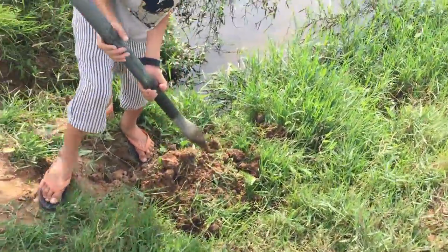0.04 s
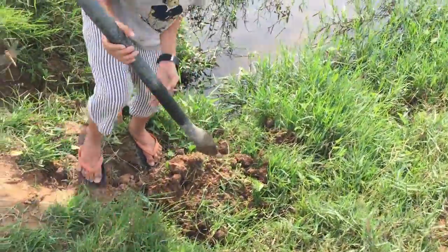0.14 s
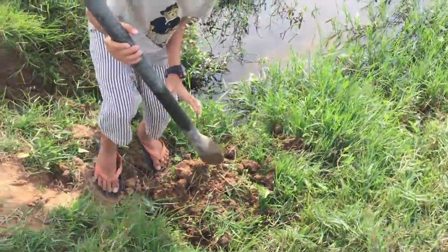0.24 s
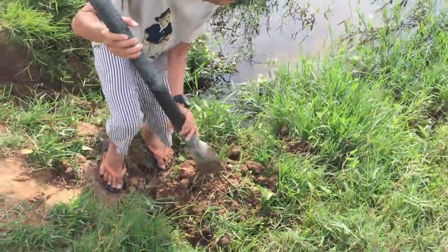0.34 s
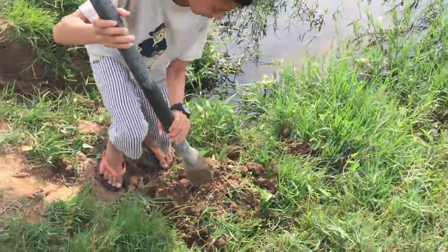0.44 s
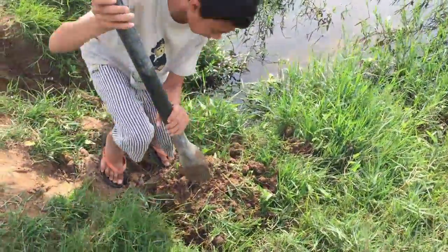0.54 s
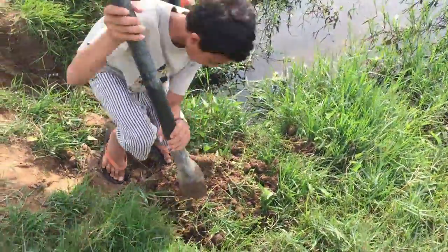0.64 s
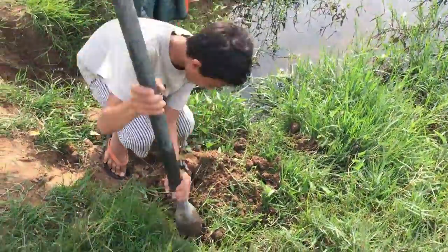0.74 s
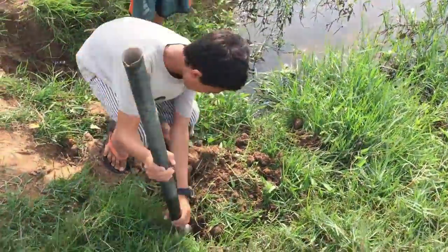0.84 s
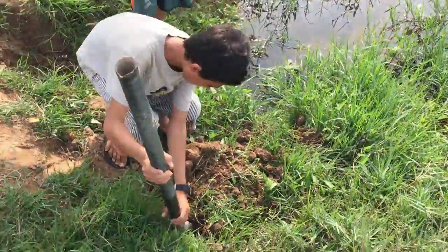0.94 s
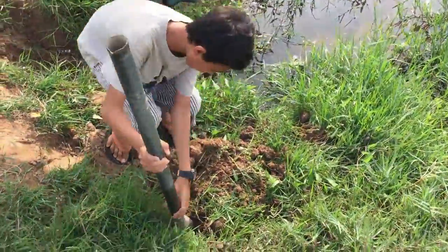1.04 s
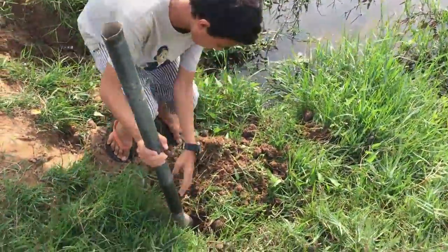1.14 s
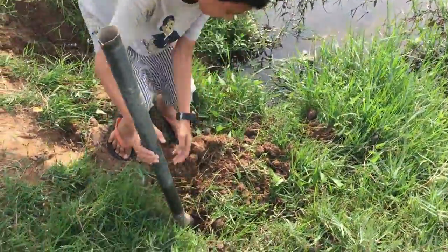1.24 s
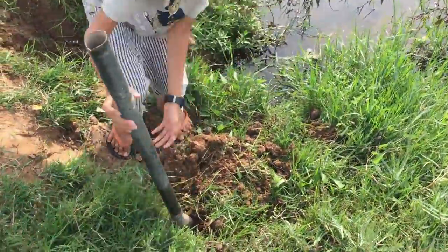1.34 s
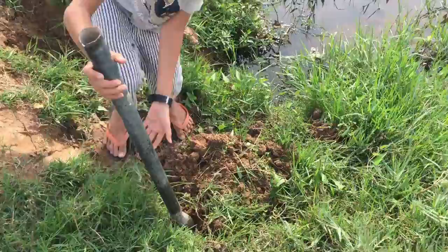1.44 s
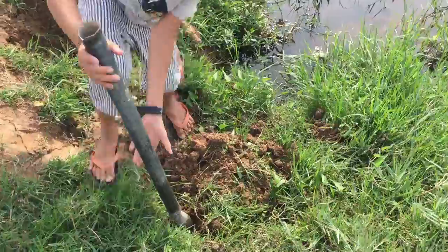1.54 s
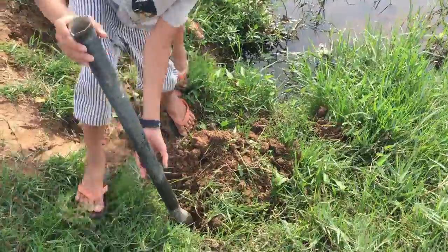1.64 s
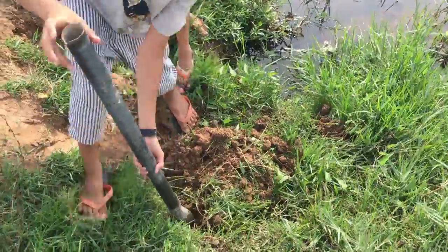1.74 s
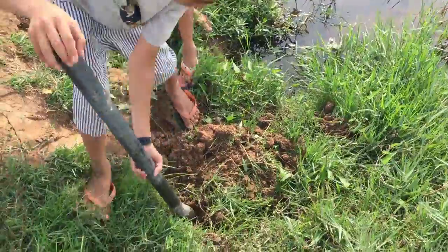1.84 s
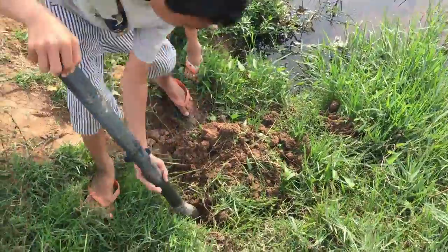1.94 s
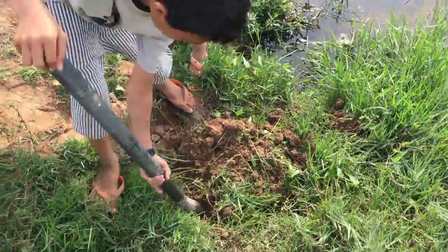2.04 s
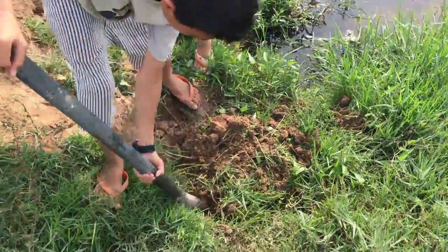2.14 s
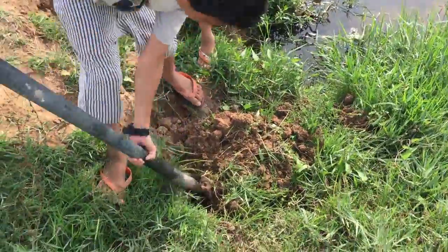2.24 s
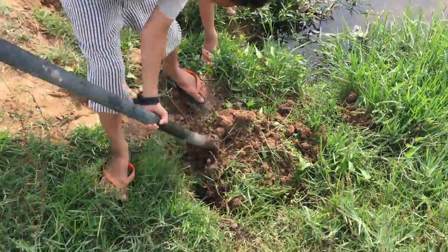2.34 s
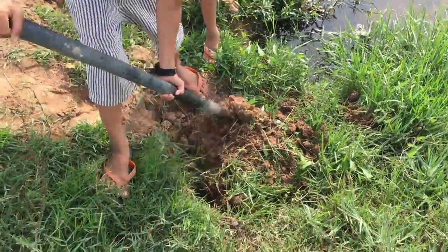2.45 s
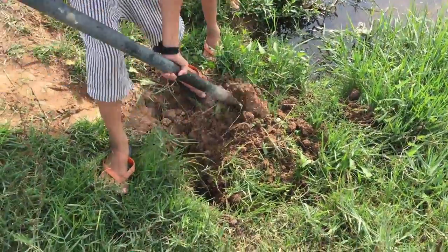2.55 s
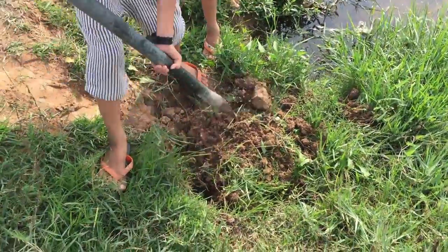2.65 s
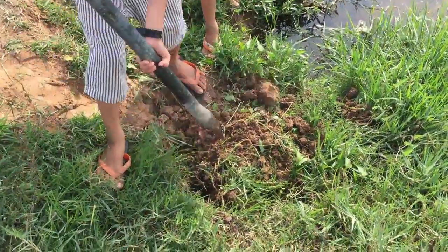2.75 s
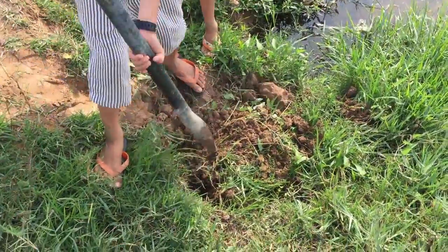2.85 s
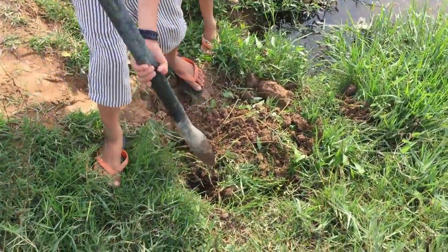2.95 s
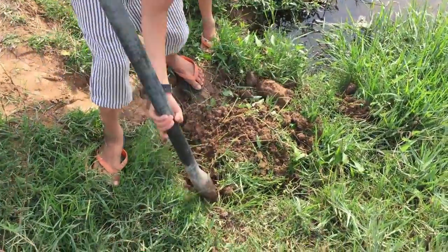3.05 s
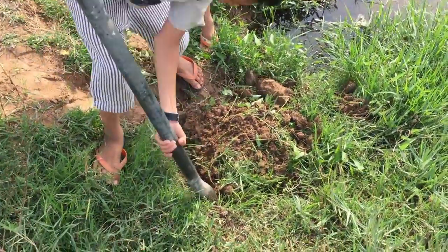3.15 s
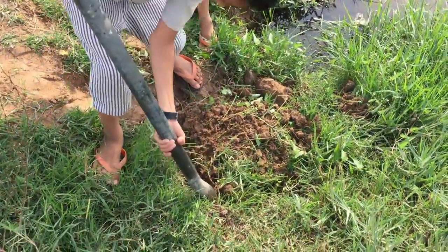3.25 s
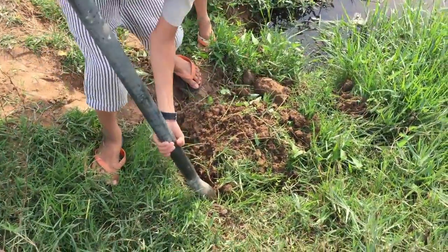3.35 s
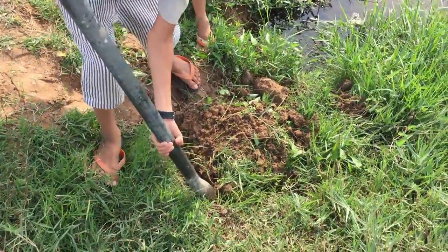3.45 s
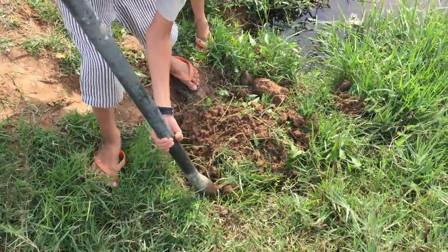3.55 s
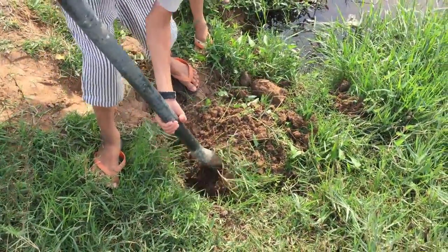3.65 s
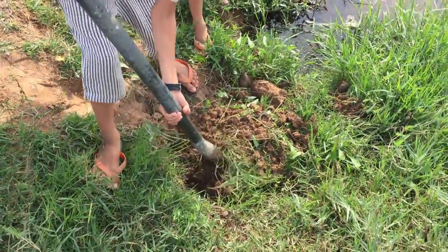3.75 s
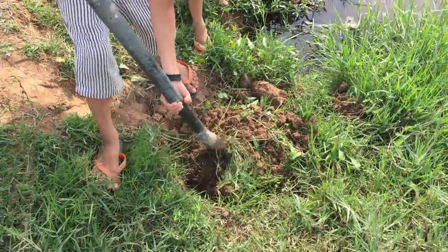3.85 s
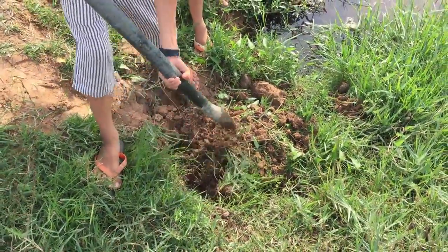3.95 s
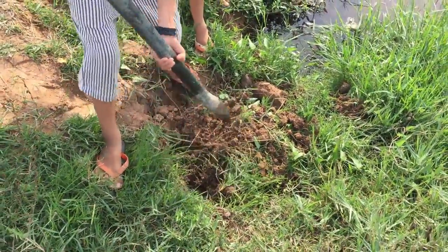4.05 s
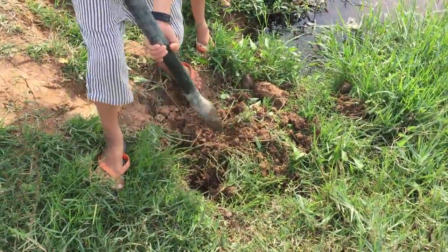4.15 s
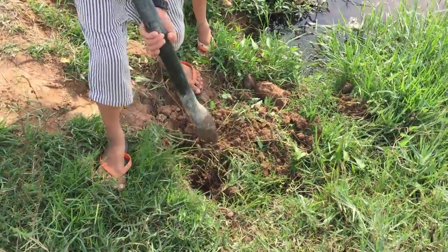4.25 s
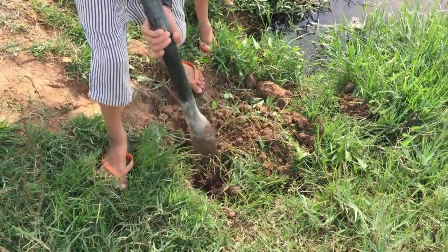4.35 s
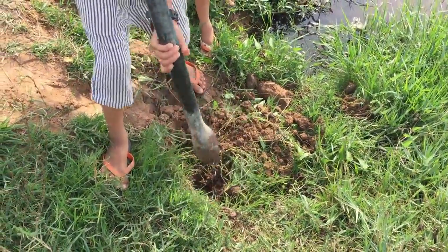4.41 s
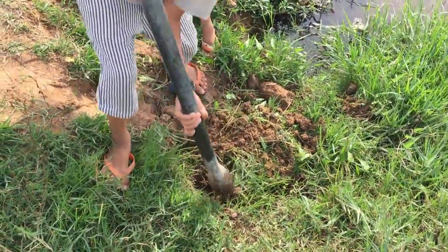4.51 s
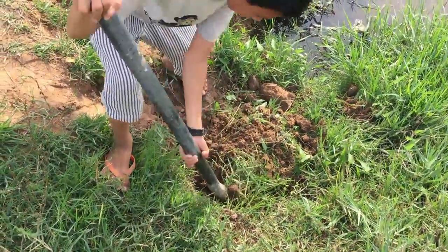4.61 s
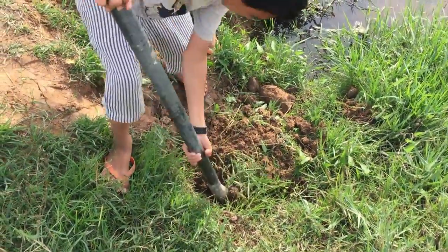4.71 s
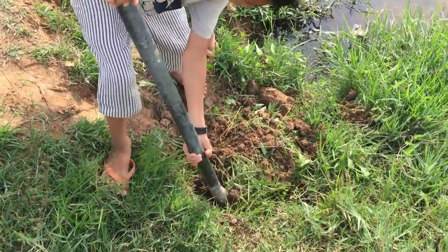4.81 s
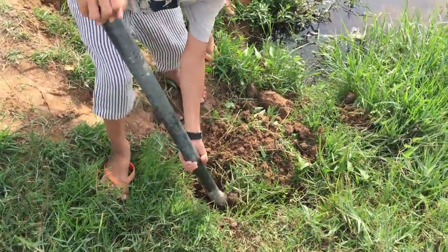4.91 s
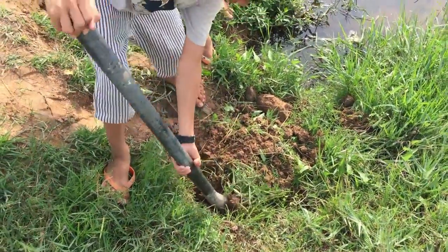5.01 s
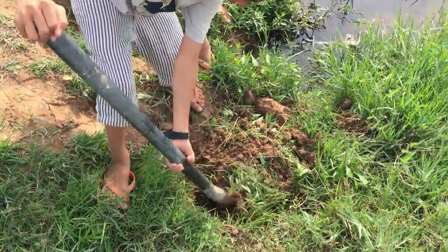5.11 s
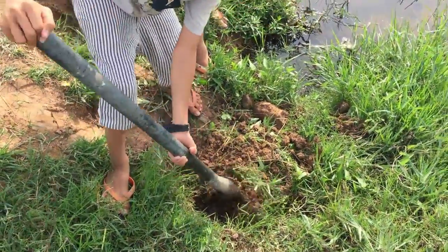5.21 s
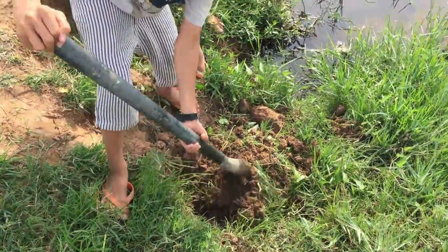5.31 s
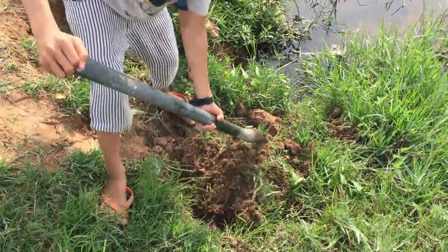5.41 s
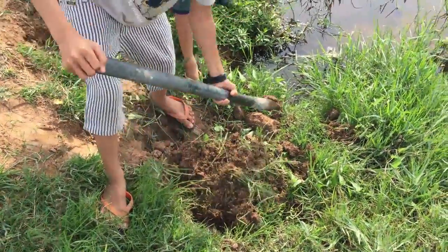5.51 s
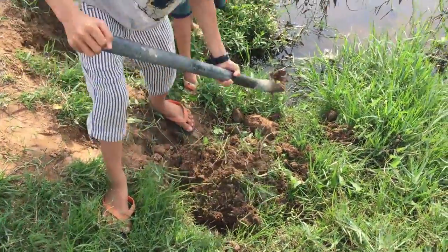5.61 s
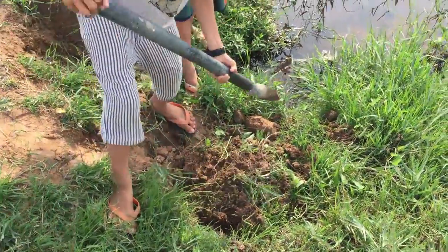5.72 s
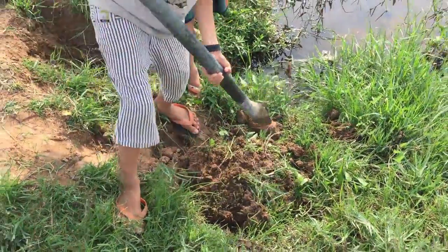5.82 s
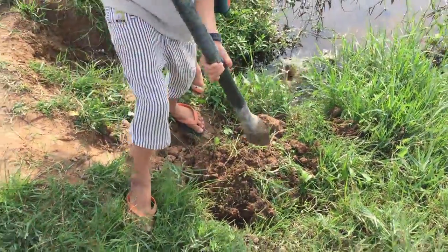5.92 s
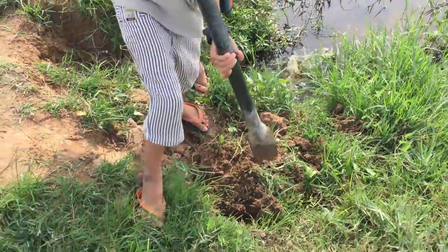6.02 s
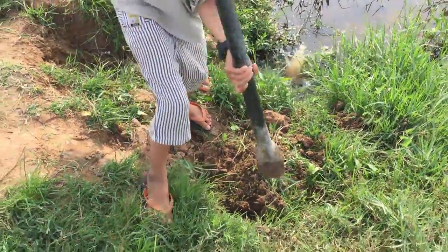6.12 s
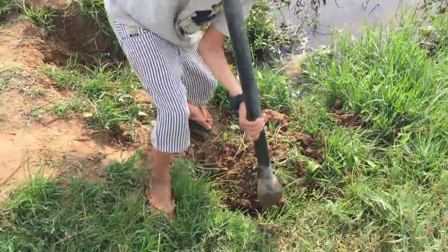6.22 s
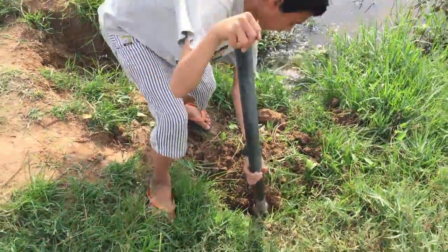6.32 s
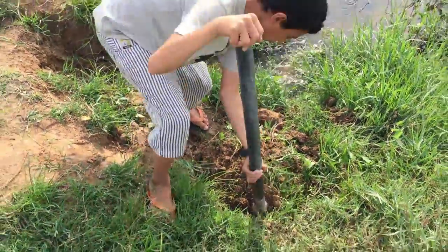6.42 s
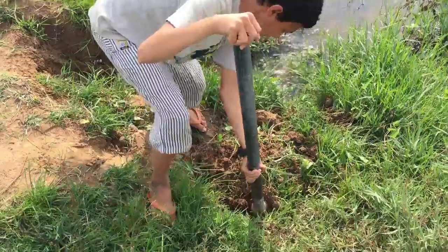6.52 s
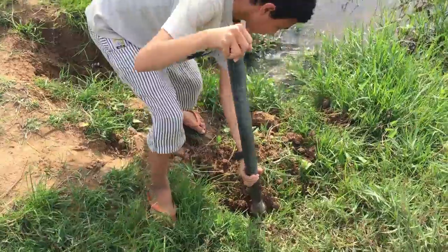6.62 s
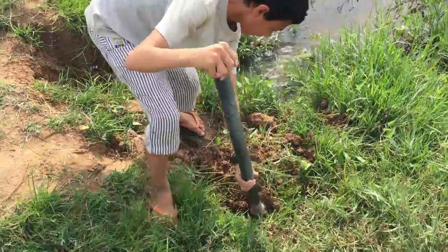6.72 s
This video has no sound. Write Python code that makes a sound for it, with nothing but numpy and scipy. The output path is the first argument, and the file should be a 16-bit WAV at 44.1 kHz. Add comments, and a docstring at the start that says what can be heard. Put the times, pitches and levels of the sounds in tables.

```python
"""Digging on a pond bank: low rumble, hum, a faint whine and soft air hiss (shaped noise and tones) run throughout.
From the start grit scrapes on steel and roots snap (showers of clicks), and a small bird sings (gliding tones).
Four chops into wet soil follow, near 0.9, 3.2, 4.7 and 6.4 s: crunching grains, ringing steel and a dull thud.
Before the last chop, crumbs and a flung clod splash into the water (click bursts), with ringing bubbles."""
import sys
import numpy as np
from scipy import signal
from scipy.fft import rfft, irfft, next_fast_len
from scipy.io import wavfile
from scipy.ndimage import uniform_filter1d, map_coordinates

SR = 44100
rng = np.random.default_rng(int(sys.argv[2]) if len(sys.argv) > 2 else 0)


def transcribe(u):
    """Save the signal u as a 16-bit wav file named by the first command-line argument.

    u: samples, shape (n,) or (channels, n), limited to [-1, 1]; the rate is SR.
    q: integer samples, one column per channel.
    """
    v = np.clip(np.atleast_2d(u).T, -1, 1)
    q = np.round(v * 32767).astype(np.int16)
    wavfile.write(sys.argv[1], SR, q)


N = 298557
TIME = np.arange(N) / SR


def amp(db):
    """Turns decibels into a plain gain."""
    return 10 ** (np.asarray(db) / 20)


def unit(x):
    """Scales a sound to an average strength (rms) of 1."""
    return x / np.sqrt(np.mean(x ** 2) + 1e-20)


def even_out(x, size):
    """Levels a sound moment by moment, so that a later curve alone sets its strength."""
    return x / np.sqrt(uniform_filter1d(x ** 2, size=size) + 1e-9)


def read(points, hz):
    """Reads a spectrum in dB, joining its points along a log-frequency axis."""
    point_hz, db = np.transpose(points)
    return np.interp(np.log(hz + 1), np.log(point_hz + 1), db)


def colour(x, gain_at):
    """Filters a sound by a gain for each frequency, then scales it to rms 1."""
    size = next_fast_len(len(x))
    spectrum = rfft(x, size) * gain_at(np.fft.rfftfreq(size, 1 / SR))
    return unit(irfft(spectrum, size)[:len(x)])


def hump(hz, octaves):
    """Makes a gain curve with one smooth hump around a centre pitch."""
    return lambda f: np.exp(-.5 * (np.log2((f + 1) / hz) / octaves) ** 2)


def resonances(modes, f):
    """Gain of an object that favours a few pitches and passes the rest evenly."""
    peaks = sum((amp(db) ** 2 - 1) / (1 + (2 * (f - hz) / width) ** 4) for hz, width, db in modes)
    return np.sqrt(np.maximum(1 + peaks, .1))


def drift(size, hz):
    """Random wandering of rms 1, mostly slower than hz."""
    return colour(rng.standard_normal(size), lambda f: np.exp(-(f / hz) ** 2))


def grains(size, per_s, spread_db, haze):
    """Tiny fractures of uneven size over a haze of finer ones."""
    happens = rng.random(size) < per_s / SR
    strength = amp(spread_db * np.minimum(rng.exponential(1, size), 4))
    clicks = rng.choice([-1, 1], size) * happens * strength
    return unit(unit(clicks) + haze * rng.standard_normal(size))


def add(mix, s, sound):
    """Mixes a sound in at time s."""
    part = mix[max(round(s * SR), 0):][:len(sound)]
    part += sound[:len(part)]


def tone(hz, waver_hz):
    """A steady tone of rms 1 whose pitch wavers a little."""
    pitch = hz + waver_hz * drift(N, 8.6)
    return unit(np.sin(2 * np.pi * np.cumsum(pitch) / SR))


# spectrum of the air hiss: (frequency [Hz], level per Hz [dB])
AIR_SPECTRUM = [(100, -12.5), (200, -1), (340, -8), (500, -11.5), (720, -11), (1100, -9), (1600, -10),
                (2900, -13), (4800, -17), (7500, -20), (8900, -16), (10300, -24), (12500, -18.5),
                (16000, -20.5)]


def open_air(patchy_db=3.0, count=12):
    """Soft hiss whose pitch bands swell and sink separately."""
    hz, _, z = signal.stft(rng.standard_normal(N), SR, nperseg=1024)
    frames = np.arange(z.shape[1])
    centres = np.geomspace(200, 16000, count)
    swells = np.array([drift(len(frames), SR / 20) for _ in centres])  # mostly slower than once in 20 frames
    band = np.interp(np.log(hz + 1), np.log(centres), np.arange(count))
    patches = map_coordinates(swells, np.meshgrid(band, frames, indexing="ij"), order=1)
    calm = 1 / (1 + hz[:, None] / 5000)  # the high hiss is steadier
    gain = amp(read(AIR_SPECTRUM, hz)[:, None] + patchy_db * calm * patches)
    return unit(signal.istft(z * gain, SR, nperseg=1024)[1][:N])


# spectrum of the low rumble: (frequency [Hz], level per Hz [dB])
RUMBLE_SPECTRUM = [(22, -55), (31, -32), (41, -7.5), (60, 0), (85, -4), (108, -5), (130, -10.5),
                   (165, -18.5), (210, -37.5), (300, -33), (500, -83)]
# slow level of rumble and hum together, before their flutter and own trims: (time [s], level [dB])
RUMBLE_LEVEL = [(0, -49.5), (1.2, -49.5), (1.7, -52.5), (3.4, -49.5), (4.7, -51.5), (5.7, -50.5),
                (6.15, -46), (6.77, -49.5)]
# slow level of the hiss: (time [s], level [dB])
AIR_LEVEL = [(0, -64), (.8, -64), (1.2, -64), (2.9, -64), (3.45, -66.5), (5, -67), (5.8, -64)]
# slow level of the far-off whine, before its flutter: (time [s], level [dB])
WHINE_LEVEL = [(2.6, -85), (3.1, -79), (5.8, -85)]


def background(rumble_db=-1, hum_hz=79, hum_db=-6, whine_hz=856):
    """Low noise and a hum flutter together, beside a faint far-off whine and the hiss of open air."""
    rumble = colour(rng.standard_normal(N), lambda f: amp(read(RUMBLE_SPECTRUM, f)))
    low = amp(rumble_db) * rumble + amp(hum_db) * tone(hum_hz, waver_hz=2.47)
    fluttering_low = low * amp(1.66 * drift(N, 16))
    whine = tone(whine_hz, waver_hz=7.07) * amp(1.8 * drift(N, 8.9))
    layers = [(fluttering_low, RUMBLE_LEVEL), (open_air(), AIR_LEVEL), (whine, WHINE_LEVEL)]
    return sum(sound * amp(np.interp(TIME, *np.transpose(level))) for sound, level in layers)


# levering and dragging, one row a stroke, levels before the judder:
# (start [s], length [s], grit level [dB], crumbling earth level [dB])
STROKES = [(0.043, 0.14, -58.5, -68.5), (0.301, 0.098, -70, -68), (.62, 0.077, -68.5, -67.5),
           (0.844, .015, -62.5, -63), (1.395, 0.13, -59.5, -62.5), (1.746, 0.013, -45.5, -50.5),
           (1.806, 0.064, -53.5, -59), (2.02, .06, -61, -68.5), (2.267, 0.034, -51.5, -56.5),
           (2.335, 0.054, -60, -64), (2.482, .032, -51.5, -60.5), (2.718, .13, -62.5, -71),
           (3.653, 0.076, -54, -54.5), (3.763, 0.046, -50.5, -59), (3.954, .052, -55.5, -67),
           (5.171, 0.21, -53.5, -59.5), (5.434, 0.048, -48, -54.5), (5.986, 0.052, -48, -57),
           (6.118, 0.11, -60.5, -65.5), (6.45, 0.092, -57, -62), (6.599, .16, -65, -69)]
# spectrum of the grit: (frequency [Hz], level per Hz [dB])
GRIT_SPECTRUM = [(1500, -14), (2600, -4), (3900, -2), (4900, -6), (6500, -2), (7700, -6), (9500, -2.5),
                 (10600, -7), (13400, -1.5), (16000, -8)]
# spectrum of the crumbling earth: (frequency [Hz], level per Hz [dB])
EARTH_SPECTRUM = [(150, 1), (300, -5), (550, -6.5), (820, -11.5), (1150, -3), (1600, -0.5), (2600, -2.5),
                  (3600, -11), (5500, -30)]
# resonances of the blade while earth presses on it, before detuning: (frequency [Hz], width [Hz], gain [dB])
PRESSED_BLADE = [(1124, 50, 5), (1577, 53, 8.5), (1983, 50, 8), (2720, 82, 6.5), (3520, 110, 4),
                 (4150, 55, 3.5), (4330, 93, 5), (5500, 160, 6), (6610, 150, 3), (9600, 150, 1)]


def scrapes(judder_db=1.7, judder_hz=70):
    """Grit rubs along the steel while the earth crumbles; both judder with the stick and slip of the blade."""
    out = np.zeros(N)
    for s, length, grit_db, earth_db in STROKES:
        # the blade gathers speed, slides and stops; longer strokes start and stop more gently
        swell, stop = .011 + .22 * length, .014 + .18 * length
        t = np.arange(max(s - 4 * swell, 0), s + length + 4 * stop, 1 / SR) - s
        off_slide = np.maximum(-t, 0) / swell + np.maximum(t - length, 0) / stop
        speed = np.exp(-off_slide ** 1.07)
        grip = 1 + 0.031 * rng.standard_normal()  # the soil's grip detunes the blade from stroke to stroke
        fine = grains(len(t), 2600, 3, .9)
        coarse = grains(len(t), 700, 3.1, .6)
        grit = colour(fine, lambda f: amp(read(GRIT_SPECTRUM, f)) * resonances(PRESSED_BLADE, f * grip))
        earth = colour(coarse, lambda f: amp(read(EARTH_SPECTRUM, f)) * resonances(PRESSED_BLADE, f * grip))
        rubbing = amp(grit_db) * grit + amp(earth_db) * earth
        judder = amp(judder_db * drift(len(t), judder_hz))
        add(out, s + t[0], speed * rubbing * judder)
    return out


def clods(x, colour_db=3.0, change_s=.035, patch_hz=260):
    """The contact keeps moving to other lumps of soil, each of which favours its own pitches."""
    z = signal.stft(x, SR, nperseg=512)[2]
    bins, frames = max(round(patch_hz * 512 / SR), 1), max(round(change_s * SR / 256), 1)
    across_pitch = uniform_filter1d(rng.standard_normal(z.shape), bins, axis=0)
    patches = unit(uniform_filter1d(across_pitch, frames, axis=1))
    recoloured = signal.istft(z * amp(colour_db * patches), SR, nperseg=512)[1][:N]
    return np.std(x) * unit(recoloured)  # keeps the overall strength


def song(hz, gain, waver_hz):
    """A near-pure bird tone follows a pitch curve; quick wavering makes it hoarse."""
    pitch = hz + waver_hz * drift(len(hz), 685)
    return gain * np.sin(2 * np.pi * np.cumsum(pitch) / SR) * signal.windows.tukey(len(hz), .12)


# the bird's hoarse chirps: (start [s], length [s], level [dB], from [Hz], to [Hz])
CHIRPS = [(0.081, 0.11, -52.5, 5940, 3000), (0.867, .07, -56, 5960, 4740), (1.029, 0.013, -53, 8200, 6160),
          (1.197, .05, -61, 4500, 4020), (1.243, .045, -64, 3500, 2900), (1.785, .11, -54.5, 2650, 2250),
          (2.19, 0.013, -54, 8000, 6400), (3.107, 0.045, -62.5, 4500, 3950),
          (4.303, 0.055, -66.5, 4400, 3960), (6.27, .05, -63, 4450, 3900)]


def chirp(start, length, db, from_hz, to_hz, hoarse=0.063):
    """One hoarse tone sweeps downward while its loudness rises and falls in an arch."""
    progress = np.linspace(0, 1, round(length * SR))
    hz = from_hz * (to_hz / from_hz) ** progress
    arch = abs(np.sin(np.pi * progress)) ** 0.77
    return start, song(hz, amp(db) * arch, waver_hz=hoarse * from_hz)


# the bird's rising trills; a negative fade grows louder, and the pitch flicks around its final height:
# (start [s], level before the throb [dB], fade [dB/s], final height [Hz])
TRILLS = [(0.164, -52.5, -2, 3703), (.948, -52, 41, 3590)]


def trill(start, db, fade, top_hz, flick_hz=66, quicken_hz_per_s=150, depth_hz=165, throb=0.76):
    """The pitch climbs and levels off while it flicks downward again and again, faster towards the end."""
    t = TIME[:round(.178 * SR)]
    flick = 2 * np.pi * np.cumsum(flick_hz + quicken_hz_per_s * t) / SR
    climb = top_hz - 624 * np.exp(-t / .043)  # starts 624 Hz lower
    hz = climb + depth_hz * np.cos(flick)
    throbbing = 1 + throb * np.sin(flick)  # loud while the pitch falls
    gain = amp(db - fade * t) * signal.windows.tukey(len(t), .25) * throbbing
    return start, song(hz, gain, waver_hz=48)


def bubble(hz, t60, glide=0.069):
    """A trapped bubble rings briefly, rising in pitch as it nears the surface."""
    t = TIME[:SR // 10]
    turns = np.cumsum(hz * (1 + glide * t / t60)) / SR
    return amp(-60 * t / t60) * (1 - np.exp(-t / 0.00028)) * np.sin(2 * np.pi * turns)


# large air bubbles in the pond, level before the soft onset, pitch at the start:
# (time [s], level [dB], pitch [Hz], time to fall 60 dB [s])
BUBBLES = [(.366, -51.5, 497, 0.089), (5.999, -35, 1330, 0.026), (6.028, -27, 1700, 0.0074),
           (6.064, -26.5, 1090, .018), (6.069, -29.5, 920, .035), (6.091, -25.5, 1126, 0.018),
           (6.318, -42.5, 3200, 0.017), (6.353, -33, 2440, 0.0066), (6.375, -28.5, 3000, 0.012),
           (6.494, -37, 1474, 0.041), (6.529, -44.5, 2500, .021)]
# showers of small drops, level of the smallest; a negative fade grows louder:
# (start [s], length [s], level [dB], fade [dB/s])
PATTERS = [(5.981, .14, -54, -2), (6.339, .36, -59, 10)]


def bubbles(drip_hz=1700, drip_octaves=0.21, drip_t60=0.014, size_db=16, count=100):
    """A few large bubbles ring amid patters of small ones with random times, pitches and sizes."""
    out = np.zeros(N)
    for s, db, hz, t60 in BUBBLES:
        add(out, s, amp(db) * bubble(hz, t60))
    for start, length, db, fade in PATTERS:
        for place, pitch, size in rng.random((count, 3)):
            # most pitches fall near drip_hz, a few stray further
            hz = drip_hz * 2 ** (drip_octaves * np.log((pitch + .02) / (1.02 - pitch)) / 2)
            later = place * length
            drop_db = db - fade * later + size_db * size ** 2
            add(out, start + later, amp(drop_db) * bubble(hz, drip_t60))
    return out


# the bird's falling whistles, the pitch halfway down after the half-fall time:
# (start [s], loudest [s], break [s], end [s], level [dB], tail level [dB], top [Hz], bottom [Hz], half fall [s])
WHISTLES = [(0.456, 0.505, .582, 0.614, -41.5, -51.5, 4160, 2875, .053),
            (0.676, .735, .765, 0.816, -40.5, -48.5, 3774, 2500, .086)]


def whistle(start, loudest, gap, end, db, tail_db, top_hz, bottom_hz, fall_s, swell_db=8, swell_s=0.014):
    """The pitch holds, slides down and flattens; the note swells as the slide begins and breaks before its tail."""
    t = np.arange(start, end, 1 / SR)
    hz = bottom_hz + (top_hz - bottom_hz) / (1 + ((t - start) / fall_s) ** 3)
    arches = abs(np.sin(np.pi * np.interp(t, [start, gap, end], [0, 1, 2]))) ** .65
    swell = swell_db * (1 - np.exp(-((t - loudest) / swell_s) ** 2))
    level = np.where(t < gap, db - swell, tail_db)
    return start, song(hz, amp(level) * arches, waver_hz=54.6)


def bursts(rows, rise_s=0.00019):
    """Short showers of clicks start quickly and die away."""
    out, t = np.zeros(N), TIME[:SR // 3]
    for s, db, hz, octaves, t60 in rows:
        shower = colour(grains(len(t), 6000, 1.8, 0.69), hump(hz, octaves))
        fade = amp(db - 60 * t / t60) * (1 - np.exp(-t / rise_s))
        add(out, s, even_out(shower, 256) * fade)
    return out


# roots and clods giving way, and one narrow knock on the handle near 1.93 s: (time [s], level [dB], centre
# [Hz], spread [octaves], time to fall 60 dB [s])
SNAPS = [(.471, -53.5, 4930, 1.4, 0.015), (1.512, -52, 1000, 1.3, .029), (1.737, -42.5, 4460, .79, 0.1),
         (1.9285, -37, 1650, 0.38, .015), (2.449, -50, 5500, 1.2, .048), (3.382, -53, 9200, .51, .014),
         (3.636, -47, 745, 1.04, 0.096), (3.683, -44, 940, 1.04, .07), (3.699, -42.5, 1400, 1.7, 0.058),
         (3.984, -42, 4020, 2.1, 0.045), (5.279, -43.5, 915, 1.3, 0.037), (5.425, -40.5, 11000, .8, 0.053),
         (5.455, -24, 4000, .73, 0.0067)]


def snaps():
    """Roots and clods let go of their stored strain in sudden bursts of tiny fractures; one narrower burst is a
    knock on the handle."""
    return bursts(SNAPS)


# one row a chop; the entry level is relative to the bite:
# (edge enters [s], full bite [s], blade stalls [s], bite level [dB], entry level [dB], fall [dB/s], tilt [dB/octave])
CHOPS = [(0.91, 0.918, 0.93, -25, -11.5, 1104, 0.5), (3.187, 3.196, 3.203, -20.5, -11, 1251, -1.3),
         (4.659, 4.665, 4.686, -30, -4.5, 942, 1.7), (6.375, 6.402, 6.413, -26.5, -12, 1057, 1)]
# resonances of the slot that the blade cuts, one list a chop: (frequency [Hz], width [Hz], gain [dB])
SLOTS = [
    [(1492, 52, 12), (1650, 64, 10), (1130, 150, 5.5), (2080, 210, 5.5), (3170, 270, 6), (5360, 140, 7)],
    [(1060, 65, 7.5), (1270, 150, 1.5), (668, 40, 12), (1990, 65, 4), (2600, 36, 11.5), (4450, 140, 10),
     (3980, 400, 4.5)],
    [(660, 96, 17), (795, 89, 12), (1220, 220, 4.5), (2040, 210, 4.5), (2760, 240, 6), (5850, 150, 7)],
    [(2180, 150, 9.5), (1490, 160, 3.5), (2430, 200, 4), (3660, 100, 7), (4180, 180, 6), (8300, 180, 7)],
]
# spectrum of the crunching soil before tilt and slot: (frequency [Hz], level per Hz [dB])
SOIL_SPECTRUM = [(150, -6.5), (500, -16), (750, -5.5), (1100, 3), (2200, 1.5), (4500, -0.5), (7000, 0),
                 (9500, 0), (10500, -6.5), (12000, -2), (15500, -4.5)]
# free ringing of blade and handle: (frequency [Hz], level relative to the bite [dB], time to fall 60 dB [s])
STEEL = [(2930, -30, 0.28), (4500, -45, 0.17), (5870, -28, 0.088), (8300, -21, .13)]


def chop(row, slot, crumbs_db=-25, crumbs_t60=0.2, onset_s=0.0039, build_db=2):
    """The edge shears through turf, bites, and stalls; crumbs trickle and the steel rings on."""
    enter, bite, stall, db, entry_db, fall, tilt = row
    t = enter - .03 + TIME[:SR // 4]
    push_times = [t[0], enter - 2 * onset_s, enter, max(bite - .003, enter), bite]
    push_db = np.interp(t, push_times, [-48, entry_db - 22, entry_db, entry_db + build_db, 0])
    after = np.maximum(t - stall, 0)
    # after the stall the crunch drops fast, then the crumbs take over
    force = amp(push_db + np.maximum(-fall * after, crumbs_db - 60 * after / crumbs_t60))

    def soil_gain(f):
        """Soil colour, tilted around 3 kHz and shaped by the slot."""
        return amp(read(SOIL_SPECTRUM, f) + tilt * np.log2((f + 100) / 3000)) * resonances(slot, f)

    # the steady push sets the power of the crunch
    crunch = even_out(colour(grains(len(t), 9000, 2.6, .7), soil_gain), 400)
    age = np.maximum(t - bite, 0)
    ring = sum(amp(g - 60 * age / t60) * np.sin(2 * np.pi * hz * age) for hz, g, t60 in STEEL)
    return t[0], amp(db) * (force * crunch + ring)


# the blow into the ground, one row a chop; thud length is its swell and fall time constant:
# (time [s], thud level [dB], thud centre [Hz], thud length [s], rebound level [dB], rebound pitch [Hz])
BLOWS = [(0.923, -35.5, 290, 0.0084, -28, 126), (3.202, -42, 253, 0.012, -35, 100),
         (4.673, -31.5, 252, 0.0055, -37, 151), (6.404, -38.5, 290, 0.011, -27, 127)]


def blows(rebound_t60=0.081, thud_octaves=0.75, rebound_delay=.0205):
    """Packed earth thuds as the blade bites; then the soft ground bounces for a few cycles."""
    out, t = np.zeros(N), TIME[:SR // 5]
    lag = t - t.mean()  # time before and after the blow
    for s, db, hz, length, rebound_db, rebound_hz in BLOWS:
        thud = even_out(colour(rng.standard_normal(len(t)), hump(hz, thud_octaves)), 400)
        settling = 0.11 * (lag > 0) * np.exp(-abs(lag) / 0.045)
        add(out, s + lag[0], amp(db) * thud * (np.exp(-abs(lag) / length) + settling))
        rebound = amp(rebound_db - 60 * t / rebound_t60) * np.sin(2 * np.pi * rebound_hz * t)
        add(out, s + rebound_delay, rebound)
    return out


# crumbs, then the clod, meet the water: (time [s], level [dB], centre [Hz])
SPLASHES = [(5.84, -47, 805), (6.018, -38, 2300), (6.062, -31.5, 4000), (6.086, -19, 2200)]


def splashes(octaves=1.67, slap_t60=0.043, spray_db=-27.5, spray_hz=2700, spray_t60=.3):
    """Each lump slaps the water and throws up a weaker spray that dies away more slowly."""
    slaps = [(s, db, hz, octaves, slap_t60) for s, db, hz in SPLASHES]
    sprays = [(s, db + spray_db, spray_hz, octaves, spray_t60) for s, db, _ in SPLASHES]
    return bursts(slaps, rise_s=0.0045) + bursts(sprays, rise_s=0.0036)


def outdoors(x, wet_db, t60):
    """The bank and bushes send back weak scattered echoes."""
    t = TIME[:SR // 2]
    happens = rng.random(len(t)) < 2000 / SR  # about 2000 echoes a second
    echoes = rng.standard_normal(len(t)) * happens * amp(-60 * t / t60) * (t > .008)
    return x + amp(wet_db) * signal.oaconvolve(x, echoes / np.linalg.norm(echoes))[:N]


def scene():
    """Mixes digging, pond and bird, each with its own echoes, over the background."""
    digging = blows() + clods(scrapes()) + snaps()
    for row, slot in zip(CHOPS, SLOTS):
        add(digging, *chop(row, slot))
    bird = np.zeros(N)
    for call, rows in (chirp, CHIRPS), (trill, TRILLS), (whistle, WHISTLES):
        for row in rows:
            add(bird, *call(*row))
    pond = splashes() + bubbles()
    near = outdoors(digging, wet_db=-36, t60=0.51)
    water = outdoors(pond, wet_db=-12.5, t60=0.12)
    singing = outdoors(bird, wet_db=-15.0, t60=0.33)
    return (near + water + singing + background())[None]


EDGE_HZ = 15900  # top of the recorder's range


def record(dry):
    """The recorder cuts off everything above its highest frequency."""
    lowpass = signal.firwin(511, EDGE_HZ, window=("kaiser", 9), fs=SR)
    return signal.oaconvolve(dry, lowpass[None], "same")


dry = scene()
out = record(dry)
transcribe(out)
```